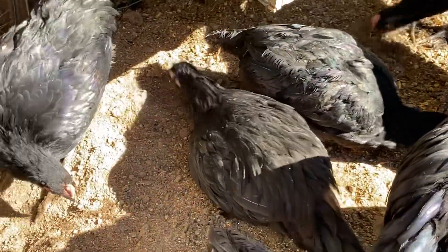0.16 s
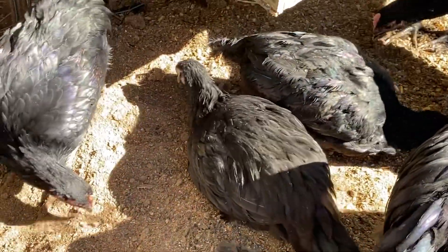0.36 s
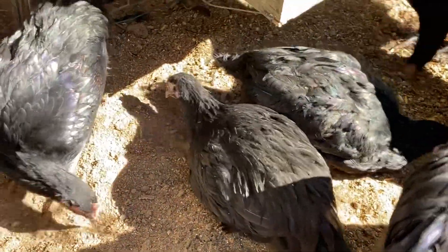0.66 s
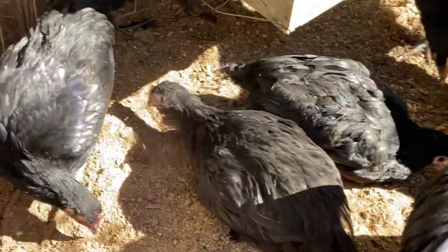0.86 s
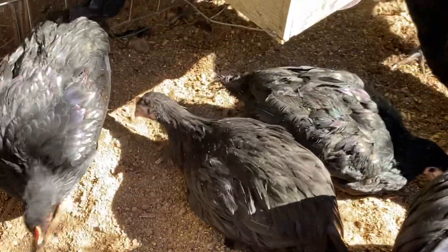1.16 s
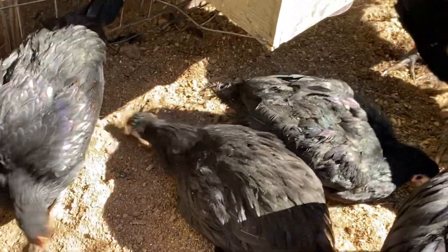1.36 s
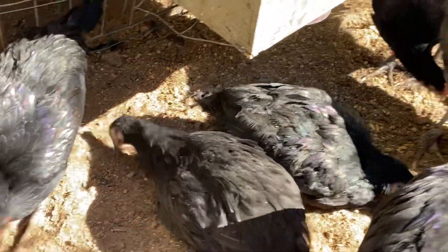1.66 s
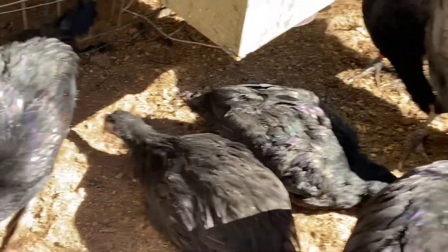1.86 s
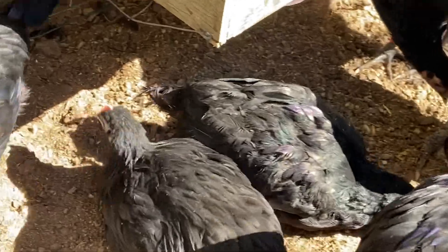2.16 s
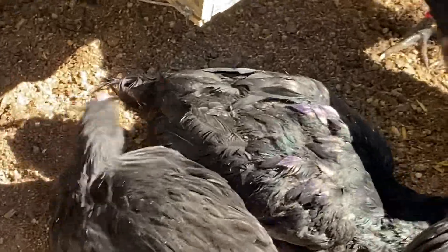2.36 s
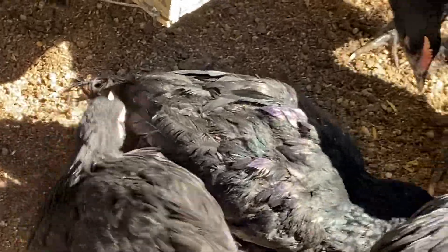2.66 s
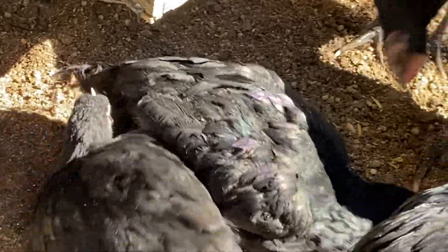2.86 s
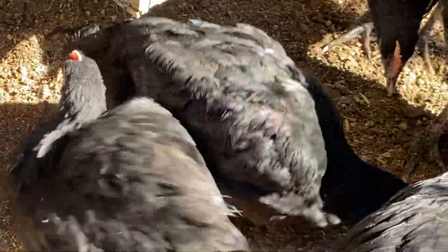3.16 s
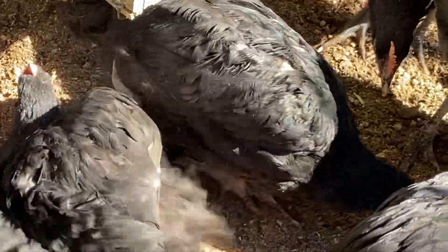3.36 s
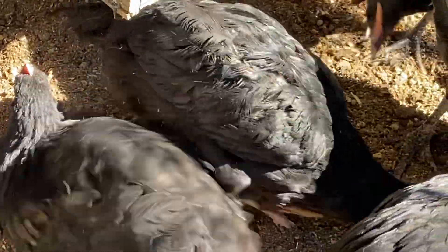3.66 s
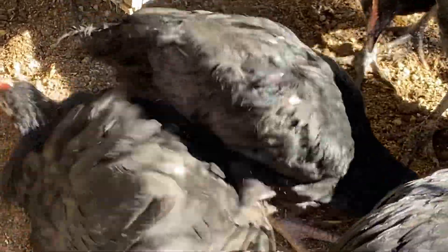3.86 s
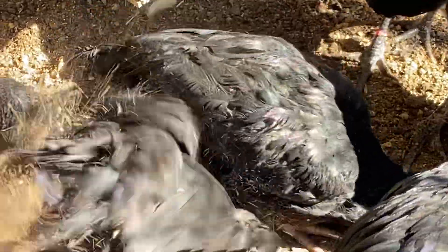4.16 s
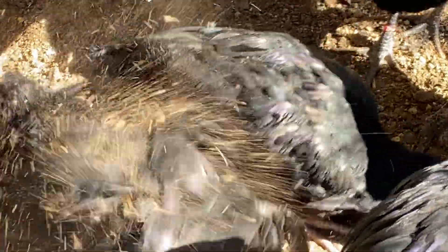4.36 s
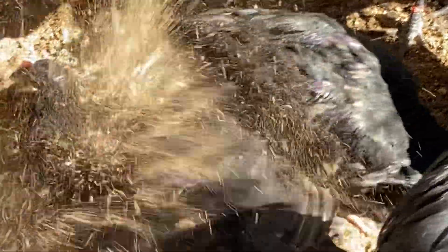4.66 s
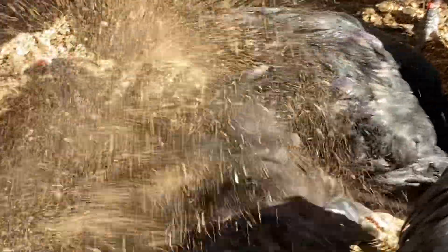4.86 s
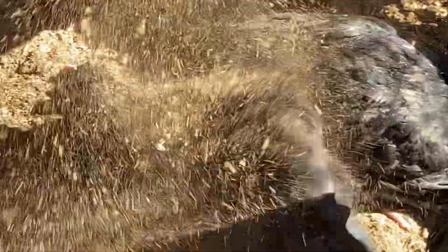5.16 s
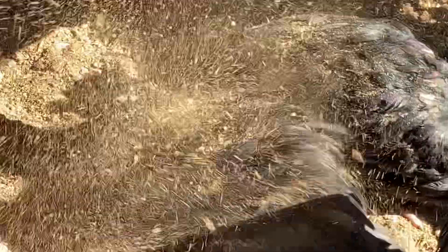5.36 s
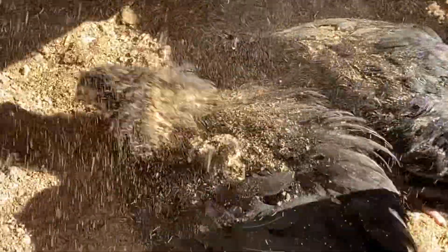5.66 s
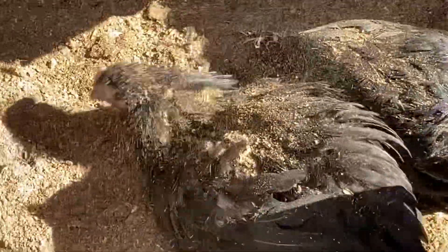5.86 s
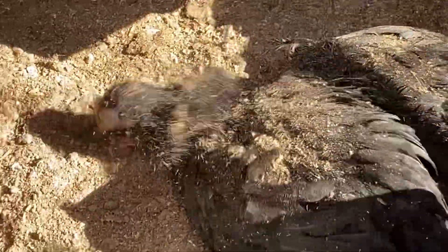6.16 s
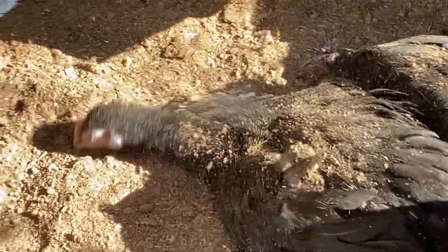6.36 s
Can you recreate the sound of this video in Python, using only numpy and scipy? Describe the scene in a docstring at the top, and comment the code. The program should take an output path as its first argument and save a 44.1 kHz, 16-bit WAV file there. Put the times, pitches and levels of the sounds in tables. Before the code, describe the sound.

Young roosters cluck and whine softly in a dirt pen, one crows hoarsely a little way off, then a bird showers gritty soil in a dust bath.

```python
"""A dirt pen with young roosters. One crows a little way off: a short note, a long hoarse one, a tiny
squeak and a clean, level ending. The crow is overtones plus rough air, shaped by a throat and beak.
The others cluck and whine softly with short gliding notes, and there are light pecks and dull bumps.
One takes a dust bath: showers of tiny random impacts are the soil it kicks over its feathers.
The pen rings faintly, and a low rumble made of filtered noise lies under everything."""
import sys
import numpy as np
from scipy import signal
from scipy.fft import rfft, irfft, next_fast_len
from scipy.io import wavfile
from scipy.ndimage import uniform_filter1d, map_coordinates

SR = 44100
rng = np.random.default_rng(int(sys.argv[2]) if len(sys.argv) > 2 else 0)


def unload_wav(signal):
    """Save mono or channel-first audio to the path in sys.argv[1] as 16-bit WAV at rate SR, clipped to [-1, 1]."""
    wavfile.write(
        sys.argv[1],
        SR,
        np.round(np.clip(np.atleast_2d(signal).T, -1, 1) * 32767).astype(np.int16),
    )


N = 287091  # length in samples
T = np.arange(N) / SR  # time of each sample, s


def amp(db):
    """Turn decibels into a gain."""
    return 10 ** (np.asarray(db) / 20)


def unit(x):
    """Scale x to an rms of 1."""
    return x / np.sqrt(np.mean(x ** 2) + 1e-20)


def along(points, hz):
    """Read (Hz, value) points on a log frequency axis."""
    f, v = np.transpose(points)
    return np.interp(np.log(hz + 1), np.log(f + 1), v)


def curves(rows):
    """Give one value per sample for each column after the time."""
    s, *cols = np.transpose(rows)
    return [np.interp(T, s, c) for c in cols]


def wobble(rate):
    """A smooth random curve through `rate` random values a second."""
    knots = rng.standard_normal(int(N * rate / SR) + 4)
    return map_coordinates(knots, [T * rate])


def filtered(x, response):
    """Multiply the spectrum of x by a response of frequency."""
    size = next_fast_len(N + SR // 2)
    hz = np.fft.rfftfreq(size, 1 / SR)
    return irfft(rfft(x, size) * response(hz), size)[..., :N]


def coloured(x, spectrum):
    """Filter x by a (Hz, dB) curve, then scale it to an rms of 1."""
    return unit(filtered(x, lambda hz: amp(along(spectrum, hz))))


def band(x, lo_hz, hi_hz, order=12):
    """Keep the part of x between two soft edges."""
    return filtered(x, lambda hz: 1 / (1 + (hz / hi_hz) ** order) - 1 / (1 + (hz / lo_hz) ** order))


def steady(x, window):
    """Hold the running rms of x at 1, over a window in seconds."""
    power = np.abs(uniform_filter1d(x * x, int(window * SR)))
    return x / np.sqrt(power + 1e-9)


def add(track, s, sound):
    """Mix a sound into a track at time s."""
    start = max(round(s * SR), 0)
    track[start:start + len(sound)] += sound[:max(N - start, 0)]


def rise_and_fade(peak_s):
    """A smooth push that reaches 1 after peak_s seconds and then dies away."""
    t = np.arange(SR // 5) / SR
    return t / peak_s * np.exp(1 - t / peak_s)


def grit(rate, spread_db):
    """Tiny impacts of unequal size, about `rate` a second."""
    hits = rng.random(N) < rate / SR
    return unit(hits * rng.standard_normal(N) * amp(spread_db * rng.exponential(size=N)))


# how the rumble swells and sinks: t/s, relative level/dB
RUMBLE_LEVEL = [(0, -44), (1.5, -48), (3.0, -48), (4.6, -43), (6.5, -43.5)]
# tone of the rumble, then of the hiss: f/Hz, relative level/dB
RUMBLE_TONE = [(18, -48.5), (30, -17.5), (48, -0.5), (68, 1.5), (110, -6), (170, -12.5), (300, -21),
               (1500, -74)]
AIR_TONE = [(100, -20), (250, 7.5), (450, 20.5), (900, 13), (1500, 0.5), (2800, 3), (4000, -4.5),
            (11000, -7), (15500, -18.5)]


def background(rumble_db=-1, air_db=-58):
    """A low rumble and the faint hiss of the air: noise that is nearly alike in both channels."""
    level, = curves(RUMBLE_LEVEL)
    rumble_noise = rng.standard_normal(N) + .045 * rng.standard_normal((2, N))
    rumble = amp(level + rumble_db) * coloured(rumble_noise, RUMBLE_TONE)
    air_noise = rng.standard_normal(N) + 0.29 * rng.standard_normal((2, N))
    hiss = amp(air_db + wobble(24)) * coloured(air_noise, AIR_TONE)
    return rumble + hiss


# light scratches and pecks: t/s, relative level/dB
PECK_TIMES = [(0.066, -47.5), (0.2356, -40), (6.136, -44), (6.254, -48), (6.4644, -48.5)]


def pecks(peck_db=-11, peck_rise=0.0069):
    """Light scratches and pecks: short pushes of gritty impacts in the middle of the range."""
    peck = np.zeros(N)
    for s, db in PECK_TIMES:
        add(peck, s, amp(db + peck_db) * rise_and_fade(peck_rise))
    return peck * unit(band(grit(rate=3700, spread_db=3.0), 1200, 4200, order=4))


def soft_call(length, start_hz, glide, beak_hz, arch=0.023, sharpness=3.96, fall_db=5, rough=0.03, count=10):
    """A short arched note from a nearly closed beak: one resonance picks out the low harmonics."""
    u = np.linspace(0, 1, int(length * SR))  # progress through the note
    k = np.arange(1, count + 1)[:, None]  # harmonic numbers
    swell = np.abs(np.sin(np.pi * u))
    # the briefer the note, the more its pitch arches; glide is in octaves
    arching = 1 + arch * min(0.01 / length, 1) ** 2 * (swell - .7)
    pitch = start_hz * 2 ** (glide * u) * arching
    waver = 1 + rough * map_coordinates(rng.standard_normal(200), [u * length * 300])
    phase = 2 * np.pi * np.cumsum(pitch * waver) / SR
    ratio = k * pitch / beak_hz
    # harmonics above the resonance lose extra level
    gains = amp(-fall_db * np.maximum(ratio - 1, 0)) / np.hypot(1, sharpness * (ratio - 1 / ratio))
    return unit(swell ** 0.36 * (gains * np.sin(k * phase)).sum(0))


# soft whines: t/s, length/s, starting pitch before the arch f/Hz, glide/octaves, level/dB
WHINE_NOTES = [(0.074, 0.035, 720, -0.28, -58.5), (0.219, .115, 728, 0, -54), (.35, .07, 725, 0, -59),
               (2.704, .05, 655, -.22, -59), (2.773, 0.37, 390, 0.33, -61), (2.956, 0.026, 1400, .4, -57),
               (3.307, 0.077, 511, -0.12, -46.5), (3.528, 0.052, 493, -0.072, -47.5),
               (3.574, 0.19, 478, -0.12, -54), (3.826, 0.044, 550, -0.075, -53),
               (4.009, 0.061, 524, 0.14, -53), (4.128, .19, 403, -0.13, -59.5), (4.41, .03, 576, -.05, -52),
               (4.845, 0.23, 316, -0.027, -57), (5.239, 0.032, 483, 0.016, -40.5),
               (5.247, 0.053, 605, -0.0079, -48.5), (5.469, 0.11, 601, -0.076, -59),
               (5.74, .05, 586, .03, -61), (5.94, 0.07, 546, .14, -62.5), (6.143, 0.04, 486, -0.12, -50.5),
               (6.494, 0.035, 479, -0.12, -46)]
WHINE_BEAK = 1.66  # a whine resonates at this multiple of its starting pitch


def whines():
    """Whines glide gently, with the beak resonance between their first two harmonics."""
    out = np.zeros(N)
    for s, length, hz, glide, db in WHINE_NOTES:
        call = soft_call(length, hz, glide, WHINE_BEAK * hz, sharpness=6.9, fall_db=10.5, rough=0.026)
        add(out, s, amp(db) * call)
    return out


# short clucks: t/s, length/s, pitch halfway through the fall f/Hz, level/dB, beak resonance f/Hz
CLUCK_NOTES = [(0.164, 0.021, 425, -47, 485), (.513, .014, 429, -52, 1270), (0.543, 0.012, 437, -46.5, 590),
               (.61, .065, 361.5, -56, 1650), (0.817, 0.015, 338, -45.5, 322),
               (3.107, .022, 454.4, -37.5, 612), (3.251, 0.0222, 472.5, -36.5, 652),
               (5.442, 0.028, 464, -42, 613), (5.826, .028, 456, -52.5, 1175),
               (6.012, .026, 388.6, -32.5, 720)]
CLUCK_FALL_OCT, CLUCK_S = .18, 0.023  # a cluck of this length, or a shorter one, drops this far in pitch


def clucks():
    """Clucks are short notes that drop in pitch, the brief ones most."""
    out = np.zeros(N)
    for s, length, hz, db, beak_hz in CLUCK_NOTES:
        fall = CLUCK_FALL_OCT * min(CLUCK_S / length, 1) ** 2
        start_hz = hz * 2 ** (fall / 2)
        call = soft_call(length, start_hz, -fall, beak_hz, arch=0.05, sharpness=3.3, rough=0.032)
        add(out, s, amp(db) * call)
    return out


# dull bumps: t/s, relative level/dB
BUMP_TIMES = [(0.2, -31), (2.622, -33.5), (2.655, -26.5), (2.699, -28), (3.39, -36), (4.25, -31),
              (4.65, -33), (4.841, -34), (6.107, -28)]


def bumps(bump_db=-4, bump_hz=66, bump_life=0.0082):
    """Dull bumps: low sine waves that rise and die quickly, each tuned a little differently."""
    out, t = np.zeros(N), np.arange(SR // 5) / SR
    for (s, db), detune in zip(BUMP_TIMES, rng.standard_normal(len(BUMP_TIMES))):
        tone = np.sin(2 * np.pi * bump_hz * np.exp(0.08 * detune) * t)
        add(out, s, amp(db + bump_db) * rise_and_fade(bump_life) * tone)
    return out


# notes of the crow: start t/s, held until t/s, end t/s, attack/s, release/s, relative level/dB,
# fade by the end/dB (negative: it grows), roughness/0-1, rasp at the start/s,
# relative chest level/dB, relative edge level/dB
CROW_NOTES = [(.877, 1.0, 1.103, 0.017, .014, -27, 10.5, .3, 0.027, -2.5, -2),
              (1.233, 1.71, 2.12, 0.0069, .03, -26.5, 7.5, .68, 0.019, -3.5, 0.5),
              (2.168, 2.2, 2.212, 0.038, .006, -37, -2, .1, .003, -17.5, 1.5),
              (2.215, 2.51, 2.505, .02, .018, -31, -1, 0.1, 0.038, -7, -5)]
# pitch of the crow, one curve for each note (short, long, squeak, last): t/s, f/Hz
CROW_PITCH = [
    [(.882, 760), (.92, 994), (.945, 987), (.98, 900), (1.01, 787.4), (1.06, 676), (1.11, 660)],
    [(1.238, 830), (1.27, 1011), (1.355, 1009), (1.408, 850), (1.46, 805), (1.505, 889), (1.525, 1015),
     (1.6, 1005), (1.635, 943), (1.67, 1156), (1.745, 1112), (1.81, 1032), (1.91, 901), (2.085, 902.3),
     (2.155, 849.3)],
    [(2.165, 1612), (2.21, 1571)],
    [(2.218, 809), (2.268, 912.5), (2.335, 951.7), (2.39, 959), (2.468, 941), (2.5, 923.6), (2.535, 848),
     (2.58, 810)],
]
# the crow swells or dips for a moment: t/s, half-width/s, louder by/dB, # more chest/dB, more edge/dB
CROW_SWELLS = [(.93, 0.021, 1, -4.5, 5), (1.305, 0.017, -5, -1, 4.5), (1.68, .025, 2, -4.5, 4),
               (1.84, 0.049, -4.5, 0, 0), (2.14, .04, -5, -3, 0), (2.27, 0.021, 7, 0.5, -2),
               (2.462, 0.0083, -7.5, 7, 7), (2.5, 0.011, 6.5, -9.5, -6.5), (2.524, .016, 3.5, 14.5, -2)]
CLEAR_HZ, CLEAR_SPAN_HZ = 1241, 344  # clear from this pitch up; hoarseness grows over the span below it
LOUDER_DB_PER_OCT, BRIGHTER_DB_PER_OCT = 4, 2.5  # a higher pitch takes more effort
# roughness as a note starts; once it has given out; how fast it then falls apart
CRACK, CRACK_END, CRACK_END_S = .85, .5, .015
TREMOR_DB, TREMOR_RATE = 1.1, 30  # the voice trembles: depth; changes a second


def effort():
    """Pitch, roughness, gain, chest and edge of the crow: notes crack at both ends, clear up when high."""
    pitch, = curves([point for note in CROW_PITCH for point in note])
    height = np.log2(pitch / 1000)  # octaves above 1000 Hz
    hoarse = np.clip((CLEAR_HZ - pitch) / CLEAR_SPAN_HZ, 0, 1)
    gain, rough, chest, edge = np.zeros((4, N))
    for (start, held, end, attack, release, db, fade_db,
         roughness, rasp_s, chest_db, edge_db) in CROW_NOTES:
        age = np.maximum(T - start, 0)
        faded = np.clip((T - held) / max(end - held, .001), 0, 1)
        swell = np.sqrt(np.minimum(age / attack, 1))
        dying = np.exp(-np.maximum(T - end, 0) / release)
        gain = gain + amp(db - fade_db * faded) * swell * dying
        crack = CRACK * np.exp(-(age / rasp_s) ** 4)
        crack = crack + CRACK_END * np.clip(.5 + (T - end) / CRACK_END_S, 0, 1)
        # each note takes over from the one before
        started = T >= start
        rough = np.where(started, np.maximum(roughness * hoarse, crack), rough)
        chest = np.where(started, chest_db, chest)
        edge = np.where(started, edge_db, edge)
    for s, width, db, chest_db, edge_db in CROW_SWELLS:
        push = np.exp(-((T - s) / width) ** 2)
        gain = gain * amp(db * push)
        chest, edge = chest + chest_db * push, edge + edge_db * push
    gain = gain * amp(LOUDER_DB_PER_OCT * height + TREMOR_DB * wobble(TREMOR_RATE))
    return pitch, np.clip(rough, 0, 1), gain, chest, edge + BRIGHTER_DB_PER_OCT * height


def voice_side(hz, rough, jitter=0.022, waver=0.011815, blur=0.085, shimmer=.45, uneven_db=6.5):
    """One vibrating side: unsteady cycles whose overtones swell and fade on their own."""
    drift = rough ** 0.79 * waver * wobble(110) + rough * jitter * wobble(500)
    phase = 2 * np.pi * np.cumsum(hz * (1 + drift)) / SR
    tone = np.zeros(N)
    for k in np.arange(1, 14):
        # the throat delays each overtone differently; strain blurs the high ones most
        lag = k * k * (1 + blur * rough * wobble(700))
        level = amp(uneven_db * rough ** .25 * wobble(40.053)) / np.hypot(1, k / 5)
        tone += level * np.cos(k * phase + lag)
    return unit(tone) * (1 + shimmer * rough * wobble(600)), phase


# throat and open beak: f/Hz, relative level/dB
THROAT_TONE = [(300, -53), (600, -18), (800, -1), (1030, 1.5), (1280, 5.5), (1850, 5.5), (2800, -2.5),
               (3450, -1.5), (4300, -13), (4800, -7.5), (6100, -9.5), (8300, -33), (11000, -26),
               (16000, -45)]


def crow(rasp=0.79, second=0.47, second_hz=850, chest_db=0, beak_db=0, edge_db=0):
    """Syrinx pulses through the throat; when rough, its two sides fall out of step and the tone breaks up."""
    pitch, rough, gain, chest, edge = effort()
    lead, phase = voice_side(pitch, rough)
    other, _ = voice_side(second_hz * (1 + .025 * wobble(25)), rough)
    # turbulent air escapes once a cycle, in ragged bursts, and is strongest in the treble
    puffs = (1 + .7 * np.cos(phase)) * amp(2.5 * wobble(220))
    air = unit(rng.standard_normal(N) * puffs)
    air = air + .4 * band(air, 4000, 20000, order=4)
    source = np.sqrt(1 - rough ** 2) * lead + second * rough * other + rasp * rough * air
    voice = coloured(source, THROAT_TONE)
    # the beak's opening shifts the weight between three regions of the voice
    low = steady(band(voice, 300, 1250), .02)
    middle = steady(band(voice, 1250, 2500), .02)
    high = steady(band(voice, 2500, 20000), .02)
    return gain * (amp(chest + chest_db) * low + amp(beak_db) * middle + amp(edge + edge_db) * high)


# wing and foot strokes through the soil: t/s, relative level/dB, body level relative to that/dB
BATH_STROKES = [(3.735, -38.5, -13), (3.901, -39, 1), (3.997, -32, -27), (4.103, -32, -4),
                (4.307, -32, -12), (4.509, -32.5, 3), (4.635, -35, -27), (4.718, -30, -30),
                (4.84, -34, -25), (4.927, -28, -28), (5.108, -34, -30), (5.159, -32.5, -20),
                (5.35, -36, -30)]
# tone of the soil: f/Hz, relative level/dB
SOIL_TONE = [(150, -8), (400, 1), (900, -1.5), (1800, -5), (2800, -1), (3600, -5), (5000, -3.5),
             (9000, -7.5), (12000, -6.5), (16000, -6)]
# soil starts to fly, flies thickest, the kicking stops (s)
BATH_START_S, BATH_FULL_S, BATH_STOP_S = 3.62, 4.6, 5.343
BUILD_DB_PER_S, SETTLE_DB_PER_S = 6.5, 78.5  # the shower thickens, then dies away


def dust_bath(shower_db=-48, thrown_db=-17, stroke_db=-11, body_db=-11, rise=0.0074, flight=0.014,
              lead_in=0.11):
    """Wings and feet sweep the soil; the thrown grains patter down on feathers and ground."""
    build = BUILD_DB_PER_S * np.maximum(BATH_FULL_S - T, 0)
    settle = SETTLE_DB_PER_S * np.maximum(T - BATH_STOP_S, 0)
    falling = amp(shower_db - build - settle) / (1 + np.exp((BATH_START_S - T) / lead_in))
    sweep, body = np.zeros(N), np.zeros(N)
    for s, db, low_db in BATH_STROKES:
        add(sweep, s, amp(db + stroke_db) * rise_and_fade(rise))
        add(body, s, amp(db + low_db + body_db) * rise_and_fade(rise))
        add(falling, s, amp(db + thrown_db) * rise_and_fade(flight))
    grains = grit(rate=3000, spread_db=1.5) + 0.44 * rng.standard_normal(N)
    grains = unit(grains * amp(1.4 * wobble(250)))  # they land in clumps
    shower = falling * amp(1.8 * wobble(60)) * coloured(grains, SOIL_TONE)
    scrape = sweep * coloured(grit(rate=10000, spread_db=-1), SOIL_TONE)
    feathers = body * unit(band(rng.standard_normal(N), 340, 830, order=3))
    return shower + scrape + feathers


# narrow resonances of the pen: f/Hz, width f/Hz, level over the direct sound/dB
PEN_RESONANCES = [(888, 23, 3.5), (1012, 27, -3), (1638, 50, -2), (1836, 32, 5), (2006, 38, -4),
                  (2567, 27, 0.5), (3405, 63, 2), (3655, 33, 1)]


def resonate(x):
    """The direct sound plus narrow pen resonances; each overtone swells as it glides through one."""
    def response(f):
        total = 1
        for hz, width, db in PEN_RESONANCES:
            total = total + amp(db) * 1j * f * width / (hz * hz - f * f + 1j * f * width)
        return total
    return filtered(x, response)


# how long the faint ring takes to fall by 60 dB: f/Hz, decay/s
PEN_RING = [(200, .3), (900, 0.94), (1900, 0.67), (3000, 0.76), (4500, 0.16), (12000, 0.16)]


def pen(x, near_db, wide_db, far_db, near_t60=0.15):
    """Ground and nearby boards answer at once, widest in the low notes; a faint ring follows."""
    hz, t, z = signal.stft(rng.standard_normal((2, SR)), SR, nperseg=256)

    def tail(t60):
        """Noise that dies away by 60 dB in t60 seconds."""
        noise = signal.istft(z * amp(-60 * t / t60), SR, nperseg=256)[1]
        return noise / np.linalg.norm(noise[0])

    near, far = tail(near_t60), tail(along(PEN_RING, hz)[:, None])
    tails = amp([[near_db], [wide_db]]) * near + amp(far_db) * far
    delayed = np.pad(x, (SR // 300, 0))[None]
    mid, side = signal.fftconvolve(delayed, tails, axes=1)[:, :N]
    side = band(side, 200, 1800, order=2)
    return np.array([x + mid + side, x + mid - side])


def scene():
    """The crowing bird stands further off than the ones in the dust, so more of the pen answers it."""
    balance = amp([[.3], [-.3]])  # the crow leans slightly to the left
    crowing = pen(resonate(crow()), near_db=-6.5, wide_db=-5.5, far_db=-22) * balance
    close_by = pecks() + whines() + clucks() + dust_bath()
    flock = pen(close_by, near_db=-12, wide_db=-15.0, far_db=-28)
    return crowing + flock + background() + bumps()


# phase between the two channels: f/Hz, phase/radians
CHANNEL_PHASE = [(0, 0), (5000, .2), (6950, 2.95), (8300, 3.7), (9900, 6.28), (11000, 6.28), (12700, 9.0),
                 (14400, 9.8), (15700, 12)]
TOP_HZ = 15800  # the band limit


def record(dry):
    """The two channels drift apart in phase through the treble; nothing is kept above the band limit."""
    def response(hz):
        turn = np.interp(hz, *np.transpose(CHANNEL_PHASE)) / 2  # half for each channel
        return np.exp(1j * np.array([turn, -turn])) * (hz < TOP_HZ)
    return filtered(dry, response)


dry = scene()
out = record(dry)
unload_wav(out)
```